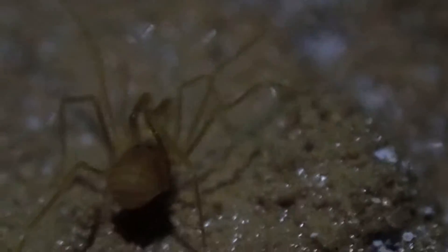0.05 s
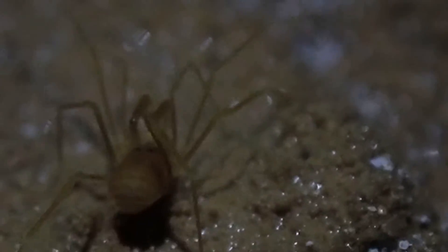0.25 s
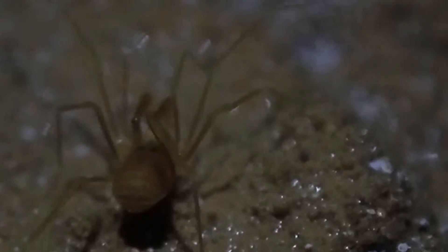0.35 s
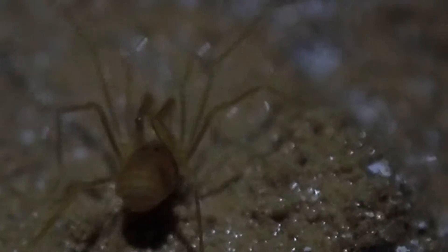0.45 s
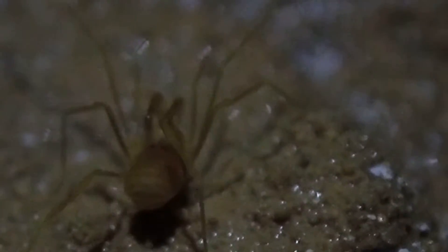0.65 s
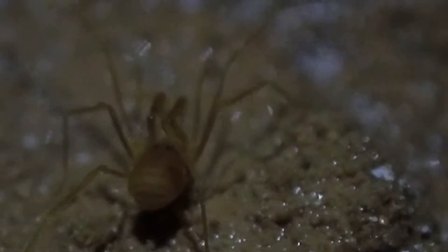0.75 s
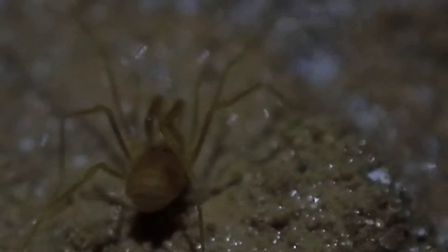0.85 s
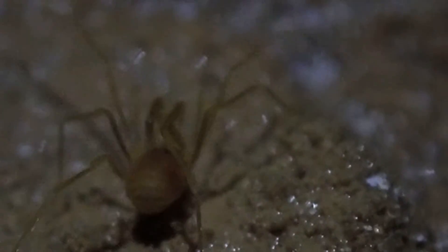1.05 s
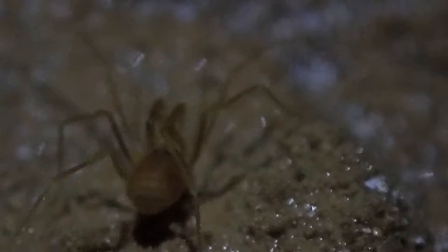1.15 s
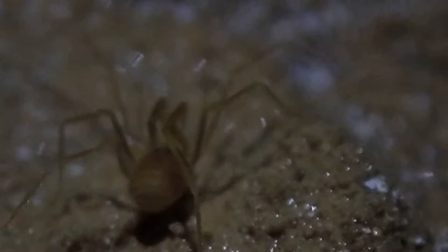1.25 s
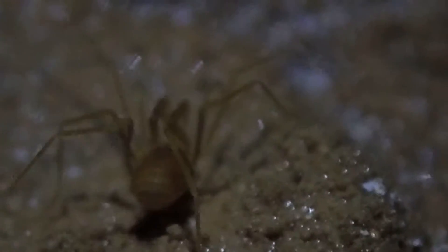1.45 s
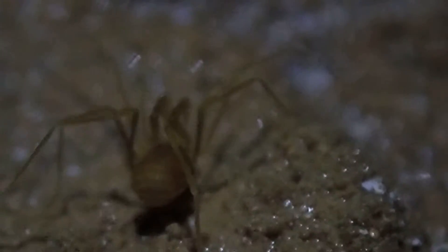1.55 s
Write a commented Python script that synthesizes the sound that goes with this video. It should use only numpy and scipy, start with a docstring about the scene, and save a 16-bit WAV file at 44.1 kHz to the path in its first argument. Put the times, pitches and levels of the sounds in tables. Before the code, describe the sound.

A single sharp click strikes the camera right by its microphones, trailed by two soft knocks and a tiny tick. Faint rubs brush the casing and die away, while a quiet, steady hiss continues in the still cave.

```python
"""A still cave, heard through a small camera whose two microphones hiss from start to end.
At 0.2 s something hard clicks sharply on the camera's housing, which rings for a moment.
A faint rub and two soft knocks follow, the last with a tiny metallic tick at 0.36 s.
Three more rubs, each fainter, pass over the housing at about 0.5, 0.9 and 1.4 s."""
import sys
import numpy as np
from scipy import signal
from scipy.fft import rfft, irfft
from scipy.io import wavfile
from scipy.ndimage import uniform_filter1d

SR = 44100
rng = np.random.default_rng(int(sys.argv[2]) if len(sys.argv) > 2 else 0)


def store_pcm(level_fs):
    """Save levels as 16-bit WAV."""
    pcm = np.round(np.clip(level_fs, -1, 1) * 32767).astype(np.int16)
    wavfile.write(sys.argv[1], SR, np.atleast_2d(pcm).T)


N = 70560  # 1.6 seconds

# The housing's own tones. Each row: pitch in Hz, level in dB, seconds to fade by 60 dB,
# left minus right level in dB.
HOUSING_TONES = [(1480, -28.5, 0.027, 1), (1730, -28.5, 0.011, 3), (2640, -21.5, 0.019, 0),
                 (2798, -16, 0.02, -3), (3080, -16.5, 0.012, 2), (3742, -9, 0.011, 0),
                 (4563, -13.5, 0.0099, -3), (5383, -21.5, 0.013, 7), (6130, -22.5, 0.013, 1),
                 (7340, -30, 0.029, -3), (8075, -17.5, 0.012, 4), (9520, -21.5, .011, 2),
                 (11500, -7.5, 0.0078, 2), (12500, -10.5, 0.0067, -2), (13600, -21, 0.016, 8)]
# Knocks on the housing. Each row: start in seconds, level in dB, treble cutoff in Hz, # level in dB of the
# second contact 0.73 ms later, compared with the first contact.
KNOCK_HITS = [(0.2097, 0, 14900, -34), (0.3001, -27, 3180, 8.5), (0.3563, -32.5, 3300, -8)]


def knocks():
    """Each knock cracks, thumps and rings the housing, then touches it again a moment later; in the second
    knock a light touch leads into the louder main hit. Softer contacts sound duller."""
    second_contact_s = 0.00073
    push = signal.unit_impulse(N)
    crack = thump = push
    for _ in range(2):
        crack = resonate(crack, hz=3600, width_hz=4500)
        thump = resonate(thump, hz=172, width_hz=152)  # the whole camera gives a little
    struck = undb(8) * crack + ring(HOUSING_TONES)
    bass_cut = signal.butter(5, 920, "high", fs=SR)  # a small shell gives off little bass
    out = 0
    for start, db, cutoff_hz, second_contact_db in KNOCK_HITS:
        body = signal.lfilter(*signal.butter(3, cutoff_hz, fs=SR), struck)
        # Treble crosses the shell a little late, at the same strength.
        body = body - 2 * resonate(body, hz=11500, width_hz=3100)
        shell = signal.lfilter(*bass_cut, body + clatter())
        hit = undb(db) * (undb(2.5) * thump + shell)
        out = out + place(hit, start) + undb(second_contact_db) * place(hit, start + second_contact_s)
    return out


# The clatter's tone colour. Each row: frequency in Hz, relative level in dB.
CLATTER_COLOUR = [(300, -21), (1000, -6.5), (2800, 9.5), (5000, -1), (7000, -6.5), (10000, -2), (12400, -1),
                  (15500, -18)]


def clatter():
    """Dense, short ringing fills the gaps between the housing's tones."""
    share = 0.44  # the part of the power that both microphones have in common
    common = np.sqrt(share) * noise(CLATTER_COLOUR)
    separate = np.sqrt(1 - share) * np.array([noise(CLATTER_COLOUR), noise(CLATTER_COLOUR)])
    return undb(-18.5) * fade(seconds=0.027) * (common + separate)


# The metal part's tones. Each row: pitch in Hz, level in dB, seconds to fade by 60 dB,
# left minus right level in dB.
METAL_TONES = [(4880, -52.5, 0.055, -11), (7970, -32.5, 0.021, 5.5), (8150, -62, .05, 3),
               (9600, -55, 0.023, 2)]


def tick():
    """A tiny metal part rings high and briefly."""
    return place(ring(METAL_TONES), start=0.3568)


# A rub's tone colour. Each row: frequency in Hz, relative level in dB.
RUB_COLOUR = [(30, -50), (500, -21), (1500, -8.5), (2200, -8.5), (2750, 1.5), (3300, -5), (4300, -6),
              (5800, -6.5), (7300, -11), (9300, -16), (10900, -17), (12000, -1), (13000, -14), (14500, -25)]
# Rubs on the housing. Each row: peak time, rise and fall in seconds, level in dB,
# tilt in dB per octave (below zero is duller).
RUB_STROKES = [(0.246, 0.023, 0.026, -46, 0), (.495, 0.034, 0.084, -51, -3), (.9, 0.031, .025, -58, -0.5),
               (1.4, 0.038, 0.058, -60.5, -3.5)]


def rubs():
    """Grainy friction on the housing swells and dies away."""
    t, out = np.arange(N) / SR, 0
    for peak, rise, fall, db, tilt_db in RUB_STROKES:
        before, after = np.minimum(t - peak, 0), np.maximum(t - peak, 0)
        swell = np.exp(-(before / rise) ** 2 - after / fall)
        grainy_level = undb(db + 2 * wander(per_second=760))
        out = out + grainy_level * swell * noise(RUB_COLOUR, tilt_db)
    return out


# The hiss's tone colour. Each row: frequency in Hz, relative level in dB.
HISS_COLOUR = [(25, -38), (60, -5.5), (130, -1.5), (300, 1), (600, -1), (1200, -3), (2000, -9),
               (3000, -11.5), (3800, -14), (4050, -19), (4300, -16), (4900, -15), (5600, -6), (6500, -8.5),
               (7550, -0.5), (8400, -3), (9250, -11.5), (10200, -9.5), (15700, -12)]


def microphone_hiss():
    """Each microphone makes its own smooth, steady hiss."""
    return undb(-47.5) * np.array([noise(HISS_COLOUR), noise(HISS_COLOUR)])


# The air's tone colour, shaped by the housing. Each row: frequency in Hz, relative level in dB.
AIR_COLOUR = [(20, -35), (40, -14), (150, 1), (600, 6), (1500, -7), (2200, -8), (2800, 5), (3300, -5),
              (5000, -4.5), (9000, -16.5), (15000, -6)]


def cave_air():
    """Faint cave air wavers slightly, the same in both microphones."""
    return undb(-59 + 0.73 * wander(per_second=12.3)) * noise(AIR_COLOUR)


def undb(db):
    """Turn decibels into a number to multiply by."""
    return 10 ** (np.asarray(db) / 20)


def noise(colour, tilt_db=0):
    """Noise of strength 1 with the given tone colour, tilted by tilt_db per octave."""
    hz, db = np.array(colour, float).T
    octave = np.log2(np.maximum(np.arange(N // 2 + 1) * SR / N, 1))
    gain = undb(np.interp(octave, np.log2(hz), db) + tilt_db * octave)
    y = irfft(rfft(rng.standard_normal(N)) * gain * (octave > 2), N)  # only above 4 Hz
    return y / y.std()


def wander(per_second):
    """A curve that glides between random values, typically about 1 away from zero."""
    hold = max(int(SR / per_second), 1)
    steps = rng.standard_normal(N)[np.arange(N) // hold]
    y = uniform_filter1d(steps, hold)
    return y / y.std()


def resonate(x, hz, width_hz):
    """A broad resonance: lets hz through unchanged and weakens what lies further away."""
    centre = 2 * np.tan(np.pi * hz / SR)
    width = centre * width_hz / hz
    return signal.lfilter(*signal.bilinear([width, 0], [1, width, centre * centre]), x)


def fade(seconds):
    """A level that drops by 60 dB in the given time."""
    return np.exp(-np.log(1000) * np.arange(N) / SR / seconds)


def ring(tones):
    """Fading pure tones, each with its own strength in the two microphones."""
    t, sides = np.arange(N) / SR, np.array([[0.5], [-0.5]])
    return sum(undb(db + sides * pan_db) * fade(seconds) * np.sin(2 * np.pi * hz * t)
               for hz, db, seconds, pan_db in tones)


def place(x, start):
    """Begin a sound at start seconds; it reaches the farther, right microphone slightly later."""
    lags_s = (0, 2.3e-5)
    return np.array([np.pad(side, (int(start * SR) + round(lag * SR), 0))[:N]
                     for side, lag in zip(x, lags_s)])


def scene():
    """Handling sounds over the cave air and the steady hiss."""
    return knocks() + tick() + rubs() + cave_air() + microphone_hiss()


def record(dry):
    """The camera flattens any peak that is too loud and cuts the treble above 15800 Hz."""
    treble_cut = signal.ellip(10, 0.1, 80, 15800, fs=SR, output="sos")
    return signal.sosfilt(treble_cut, np.clip(dry, -0.95, 0.95))


dry = scene()
out = record(dry)
store_pcm(out)
```